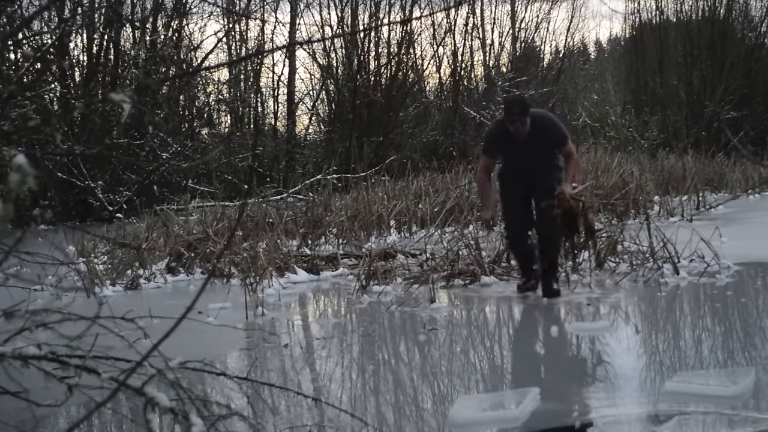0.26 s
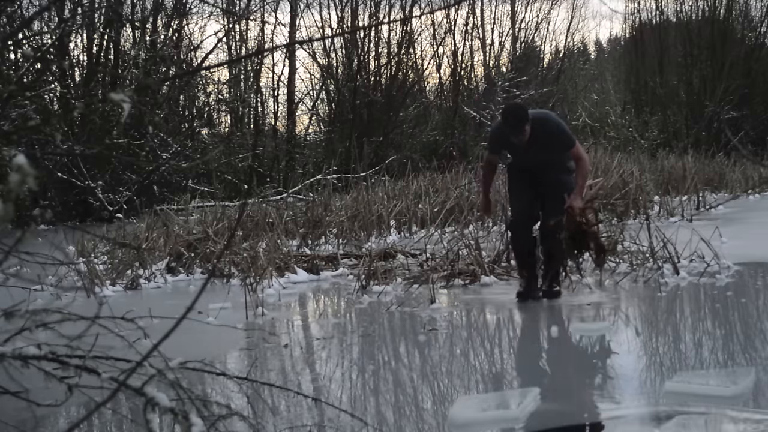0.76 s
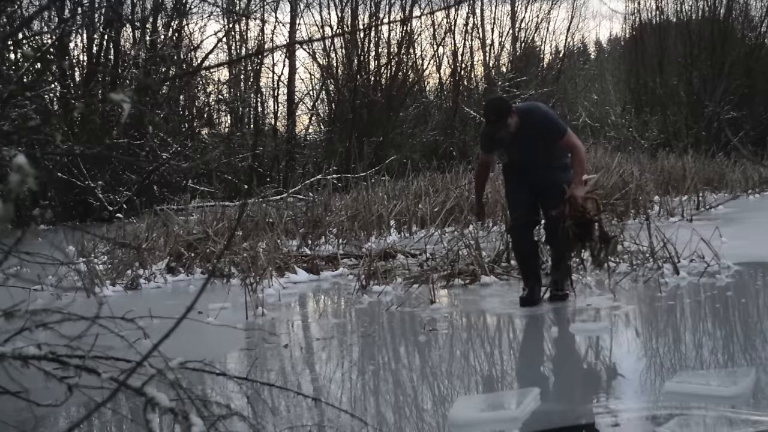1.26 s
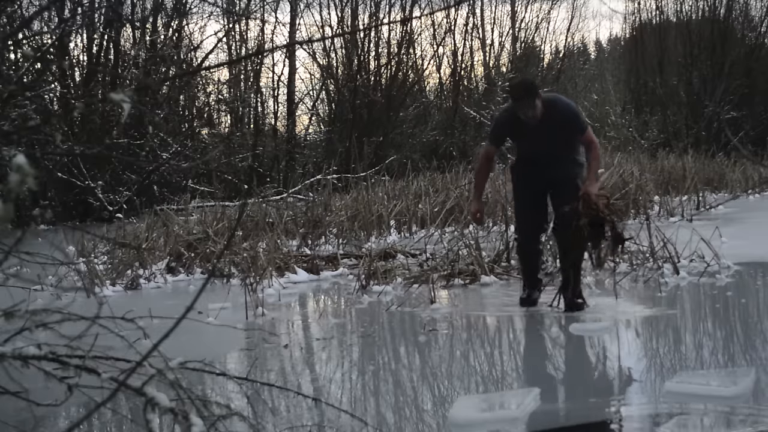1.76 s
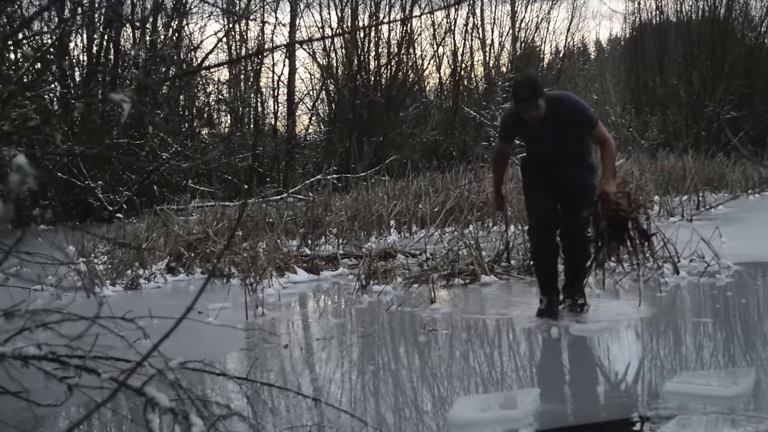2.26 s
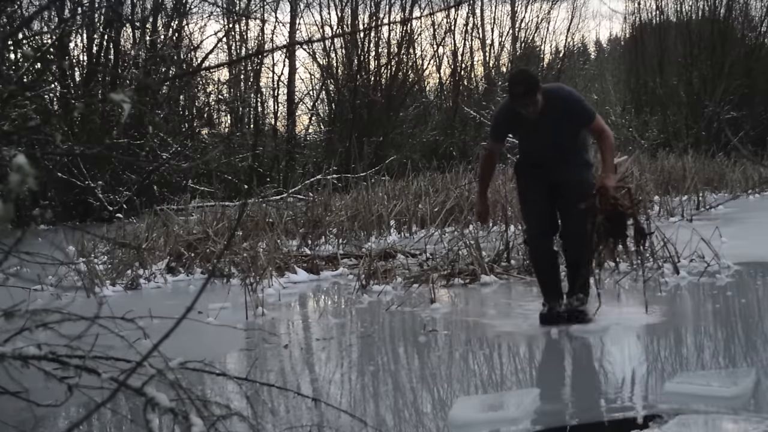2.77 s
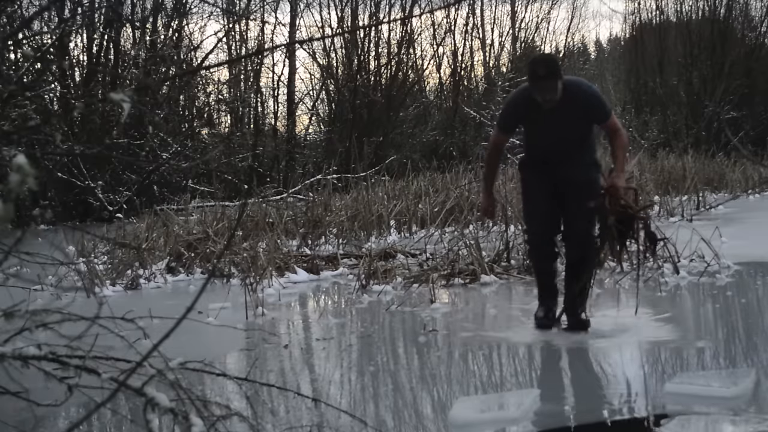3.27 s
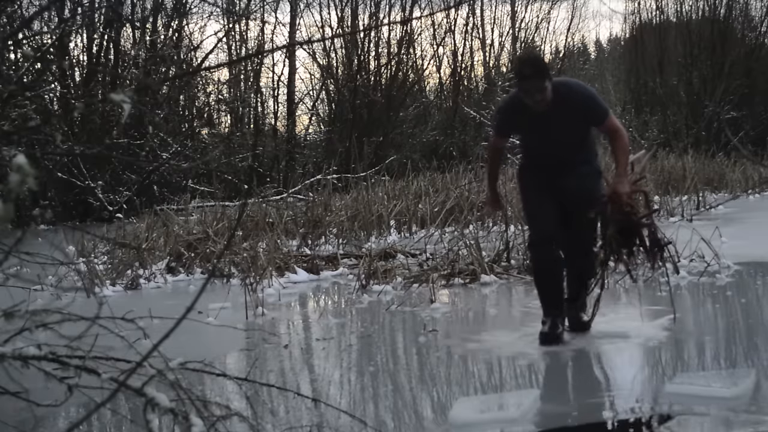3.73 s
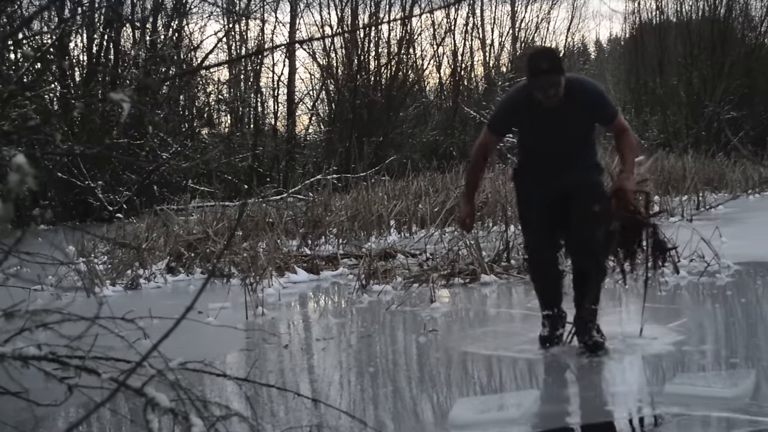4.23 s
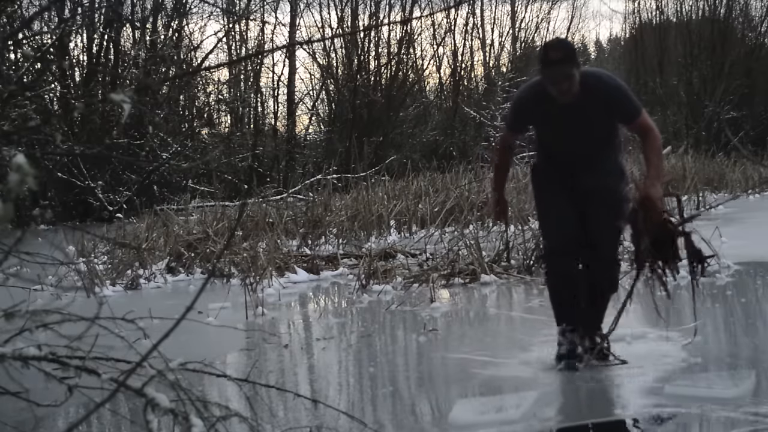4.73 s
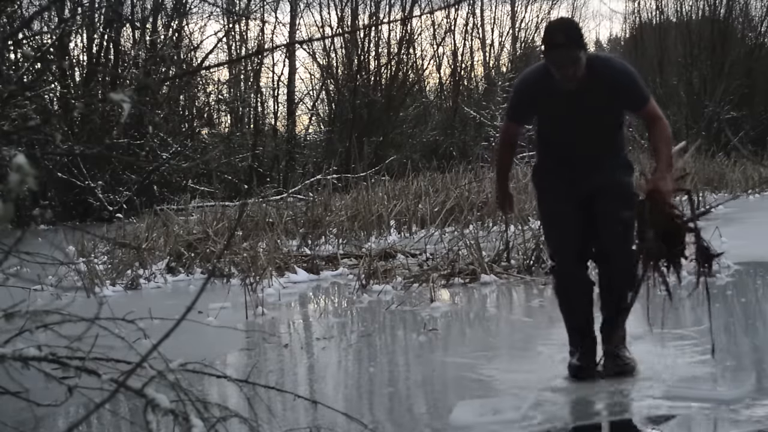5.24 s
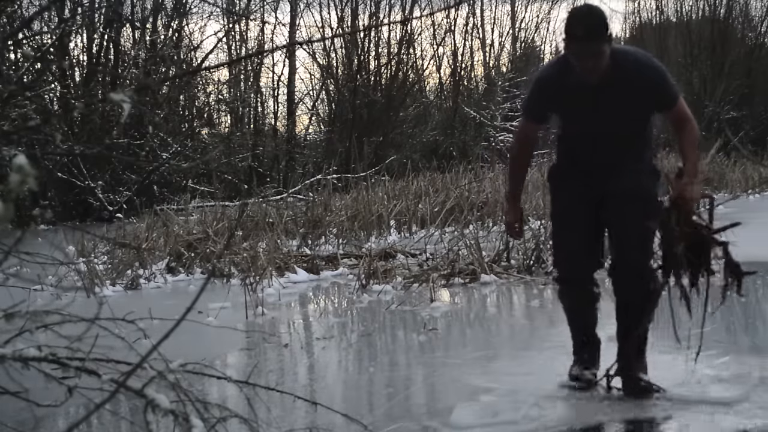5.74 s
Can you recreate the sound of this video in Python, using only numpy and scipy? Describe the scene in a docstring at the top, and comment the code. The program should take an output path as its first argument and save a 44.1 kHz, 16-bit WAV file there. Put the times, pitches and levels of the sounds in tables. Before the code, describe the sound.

Someone wades towards the listener over a frozen pond; water sprays and sloshes, ice pings and snaps, over a faint distant rumble.

```python
"""Boots on a wet frozen pond

A man in boots walks towards the microphone over thin ice with a film of water on it.
The ice cracks under his weight: each crack sends a short tone near 1 kHz ahead of its own snap.
At each stride the lifted boot gulps and ploughs up spray and drops; the water calms when he stands.
A low rumble lies far behind the trees. Clicks, ringing bubbles, short tones and filtered noise make it all."""
import sys
import numpy as np
from scipy import signal
from scipy.fft import rfft, irfft
from scipy.io import wavfile
from scipy.ndimage import uniform_filter1d

SR = 44100
rng = np.random.default_rng(int(sys.argv[2]) if len(sys.argv) > 2 else 0)


def transcribe(u):
    """Save the signal u as a 16-bit wav file named by the first command-line argument.

    u: samples, shape (n,) or (channels, n), limited to [-1, 1]; the rate is SR.
    q: integer samples, one column per channel.
    """
    v = np.clip(np.atleast_2d(u).T, -1, 1)
    q = np.round(v * 32767).astype(np.int16)
    wavfile.write(sys.argv[1], SR, q)


N = 264600
TIME = np.arange(N) / SR


def undb(db):
    """Decibels to gain."""
    return 10 ** (np.asarray(db) / 20)


def unit(x):
    """Scale to an rms of one."""
    return x / np.sqrt(np.mean(x ** 2))


def colour(x, points):
    """Shape the spectrum through (Hz, dB) points, with a filter that never sounds early and has unit power."""
    hz, db = np.transpose(points)
    log_freq = np.log(np.fft.rfftfreq(N, 1 / SR) + 1)
    gain = undb(np.interp(log_freq, np.log(hz), db))
    # Folding the cepstrum forward in time gives the minimum-phase filter.
    cepstrum = irfft(np.log(unit(gain)), N)
    cepstrum[1:N // 2] *= 2
    cepstrum[N // 2 + 1:] = 0
    impulse = irfft(np.exp(rfft(cepstrum)), N)[:4096]
    return signal.fftconvolve(x, impulse)[:N]


def add(out, start_s, sound):
    """Mix a short sound into a track, cutting off what falls outside."""
    i = int(round(start_s * SR))
    lo, hi = max(i, 0), min(i + len(sound), N)
    if hi > lo:
        out[lo:hi] += sound[lo - i:hi - i]


def wander(rate_hz):
    """Smooth random ups and downs around zero, with an rms of one."""
    step = max(int(SR / rate_hz), 1)
    held = rng.standard_normal(N)[np.arange(N) // step]
    return unit(uniform_filter1d(held, step))


def patter(rate_hz, spread_db):
    """Random clicks; a positive spread makes a few much larger, a negative one a few much smaller."""
    hit = rng.random(N) < rate_hz / SR
    size = np.minimum(rng.exponential(size=N), 6)
    sign = rng.choice([-1, 1], N)
    return unit(hit * undb(spread_db * size) * sign)


def bubble(hz, cycles, rise=0.07, onset=0.05):
    """A damped ring that starts within a cycle; its pitch creeps up as the bubble nears the surface."""
    turns = np.arange(int(5 * cycles * SR / hz)) * hz / SR
    envelope = (1 - np.exp(-turns / onset)) * np.exp(-turns / cycles)
    return envelope * np.sin(2 * np.pi * turns * (1 + rise * turns / cycles / 2))


def bubbles(low_hz, high_hz, cycles, spread_db, count):
    """A steady swarm of bubbles of mixed sizes."""
    out = np.zeros(N)
    for when, pitch, damping, size in rng.random((count, 4)):
        hz = low_hz * (high_hz / low_hz) ** pitch
        size_db = -spread_db * np.log(size + 0.033)
        add(out, when * N / SR, undb(size_db) * bubble(hz, cycles * (.5 + damping)))
    return unit(out)


def flexure(hz, swell_ms, bend=0.024, stop_ms=0.31, shape=1.25):
    """Bending waves outrun the air: a tone swells, sinks a little and stops as the snap arrives."""
    lead_s = 4 * swell_ms / 1000  # how far the sound begins before its snap
    t = np.arange(-int(lead_s * SR), int(.004 * SR)) / SR
    early = np.maximum(-t, 0) * 1000 / swell_ms
    late = np.maximum(t, 0) * 1000 / stop_ms
    phase = 2 * np.pi * (hz * t * (1 + bend * (early / 2 - 1)) + rng.random())
    return np.exp(-early ** shape - late) * np.sin(phase), lead_s


def approach(far_db, near_db):
    """Gain that grows steadily from start to end, as the walker comes near."""
    return undb(far_db + (near_db - far_db) * TIME / TIME[-1])


def swell(start_s, hold_s, attack_s, release_s):
    """An envelope: it grows up to the start, holds, then fades."""
    before = np.maximum(start_s - TIME, 0)
    after = np.maximum(TIME - start_s - hold_s, 0)
    return np.exp(-before / attack_s - after / release_s)


# Colour of the far rumble: pitch_hz, relative level_db (per Hz)
RUMBLE_COLOUR = [(20, -14), (45, -3.5), (75, 0.5), (130, -2), (220, -5), (450, -11.5), (1000, -14),
                 (2500, -44), (8000, -33), (16000, -29)]


def distant_rumble():
    """Low filtered noise from far behind the trees, which slowly grows."""
    return colour(rng.standard_normal(N), RUMBLE_COLOUR) * approach(-49.5, -47.5)


# His weight bears on the ice: start_s, length_s, creak level_db (at the start, before the sag)
WEIGHT_SHIFTS = [(0.539, 0.062, -40.5), (0.733, 0.012, -42), (.93, 0.012, -45), (1.17, 0.25, -53),
                 (1.552, 0.05, -49.5), (1.797, 0.067, -43), (2.103, 0.016, -50), (2.292, 0.034, -47),
                 (2.598, 0.12, -44.5), (3.196, .03, -39), (3.305, .21, -47.5), (3.896, 0.072, -37),
                 (3.985, 0.11, -41.5), (4.085, 0.052, -35.5), (4.342, .03, -39), (4.497, 0.048, -46),
                 (4.595, 0.11, -42.5), (4.774, 0.031, -36.5), (4.981, 0.026, -38.5), (5.146, 0.02, -31),
                 (5.351, 0.024, -32), (5.457, .03, -33), (5.515, 0.032, -35.5), (5.633, 0.04, -37.5),
                 (5.692, 0.055, -35.5), (5.799, 0.038, -32.5), (5.943, 0.025, -37)]


def strain(sag_db_per_s=14, attack_s=0.0058, release_s=0.017):
    """How hard the ice is bent: each shift of weight builds up, sags as the ice cracks, and lets go."""
    power = np.zeros(N)
    for start_s, length_s, db in WEIGHT_SHIFTS:
        sag_db = sag_db_per_s * np.maximum(TIME - start_s, 0)
        power += (undb(db - sag_db) * swell(start_s, length_s, attack_s, release_s)) ** 2
    return np.sqrt(power)


def creak(load, far_hz=980, near_hz=1190, far_ms=5.6, near_ms=1.6, scatter=0.22, spread_db=4.0, count=1400):
    """Many tiny cracks get louder with strain; their tones get higher and shorter as the walker nears."""
    out = np.zeros(N)
    for k, (late, detune, size) in enumerate(rng.random((count, 3))):
        near = (k + late) / count
        hz = (far_hz + near * (near_hz - far_hz)) * (1 + scatter * (detune - .5))
        tone, lead_s = flexure(hz, far_ms + near * (near_ms - far_ms))
        add(out, near * N / SR - lead_s, undb(-spread_db * np.log(size + 0.0067)) * tone)
    resting = approach(-75.5, -46.5)  # faint creaking between the loads
    return unit(out) * np.hypot(load, resting)


def wash(start_s, end_s, attack_s=0.035, release_s=0.048, settle_db=-14, settle_s=0.4):
    """Water set moving by a boot: it is pushed for a while, then trickles back slowly."""
    hold_s = max(end_s - start_s, 0)
    push = swell(start_s, hold_s, attack_s, release_s)
    return np.hypot(push, undb(settle_db) * swell(start_s, hold_s, attack_s, settle_s))


# A boot lifts and swings forward: lift_s (middle of the gulp), gulp_length_s, gulp level_db,
# plough_delay_s (after the lift, or before it if negative), plough_length_s, spray level_db, slosh level_db.
# Levels are relative: each sound adds its own gain.
STRIDES = [(.09, .05, -67, 0.023, 0.027, -41.5, -54), (.785, .1, -45.5, -0.036, 0.21, -43.5, -49),
           (1.444, 0.092, -42, 0.049, 0.21, -43.5, -51.5), (2.12, 0.14, -46.5, 0.041, 0.28, -43.5, -50.5),
           (2.865, .12, -41.5, 0.098, 0.18, -43, -53.5), (3.41, 0.093, -45.5, 0.012, 0.21, -42.5, -52),
           (4.137, .085, -44, -0.072, 0.41, -41, -51.5), (4.719, 0.089, -40.5, -0.054, 0.4, -40, -48.5),
           (5.352, 0.068, -43.5, -0.052, 0.23, -37.5, -46), (5.869, 0.17, -42, 0.028, 0.03, -36, -44.5)]


def flow(load, squeezed_spray_db=-11, squeezed_slosh_db=-15, slosh_lag_s=0.037, slosh_sag_db_per_s=24):
    """Strength of spray and slosh: restless film, water squeezed out by the load, and ploughing boots."""
    spray = approach(-53.5, -46.5) ** 2 + (load * undb(squeezed_spray_db)) ** 2
    slosh = approach(-60, -54) ** 2 + (load * undb(squeezed_slosh_db)) ** 2
    for lift_s, _, _, delay_s, plough_s, spray_db, slosh_db in STRIDES:
        end_s = lift_s + delay_s + plough_s
        # The bow wave rises at the lift and dies down during the swing.
        sag_db = slosh_sag_db_per_s * np.maximum(TIME - lift_s, 0)
        spray += (wash(lift_s + delay_s, end_s) * undb(spray_db)) ** 2
        slosh += (wash(lift_s + slosh_lag_s, end_s) * undb(slosh_db - sag_db)) ** 2
    return np.sqrt(spray), np.sqrt(slosh)


# Colours of flying spray and of heavier slosh: pitch_hz, relative level_db (per Hz)
SPRAY_COLOUR = [(1500, -18), (3000, -10), (5000, -8.5), (7000, -4.5), (9000, 1), (10500, -5.5),
                (12500, -15.5), (16000, -31)]
SLOSH_COLOUR = [(300, -29.5), (700, 5.5), (1300, -0.5), (2000, 1.5), (3200, -4), (5000, -23), (9000, -32)]


def wading(load, spray_gain_db=1, slosh_gain_db=2.5):
    """Clicks and bubbles swell and ebb with each stride; single droplets tick on the ice."""
    spray_flow, slosh_flow = flow(load)
    surge_db = 1.75 * wander(rate_hz=99)
    ticks = patter(rate_hz=90, spread_db=0.5)
    fizz = bubbles(low_hz=3850, high_hz=12600, cycles=7.7, spread_db=3.0, count=2400)
    spray = patter(rate_hz=6000, spread_db=-0.4) + undb(-6.5) * fizz + undb(-5.5) * ticks
    spray = unit(colour(spray, SPRAY_COLOUR)) * spray_flow * undb(spray_gain_db)
    froth = bubbles(low_hz=1114, high_hz=4600, cycles=6.9, spread_db=2.5, count=2600)
    slosh = patter(rate_hz=3000, spread_db=4.5) + undb(-6.5) * froth + undb(-12.5) * ticks
    slosh = unit(colour(slosh, SLOSH_COLOUR)) * slosh_flow * undb(slosh_gain_db)
    return (spray + slosh) * undb(surge_db)


# Both boots stand still: start_s, length_s
PAUSES = [(.43, 0.019), (0.63, 0.011), (1.078, 0.016), (1.906, 0.12), (2.518, 0.041), (3.745, 0.072),
          (5.208, 0.054)]


def calm(drop_db=-4, fade_s=0.0097):
    """Gain of the water and the creaking, which die down while the walker stands still."""
    still = np.max([swell(start_s, length_s, fade_s, fade_s) for start_s, length_s in PAUSES], axis=0)
    return undb(drop_db * still)


def gulps(start_hz=920, end_hz=482, scatter=0.24, cycles=2.37, glide=0.046, gain_db=1.5, spread_db=7,
          high_ratio=1.75, high_db=-4, count=30):
    """The hollow under a lifting boot grows and swallows ever larger, lower bubbles; smaller ones break off."""
    out = np.zeros(N)
    for lift_s, length_s, db, *_ in STRIDES:
        for k, (late, detune, size, split) in enumerate(rng.random((count, 4))):
            u = 1.6 * ((k + late) / count - .5)  # place in the gulp, in gulp lengths from its middle
            hz = start_hz * (end_hz / start_hz) ** (u + .5) * np.exp(scatter * 2 * (detune - .5))
            gain = undb(db + gain_db + spread_db * (2 * size - 0.5)) * np.exp(-4 * u ** 2)
            high_hz = hz * high_ratio * 2 ** (split - .5)
            add(out, lift_s + u * length_s, gain * bubble(hz, cycles, glide))
            add(out, lift_s + u * length_s, gain * undb(high_db) * bubble(high_hz, cycles, glide))
    return out


# Wet slaps of a sole: peak_s, level_db, rise_ms, fall_ms
SLAPS = [(.077, -29, 8.8, 5.8), (.1, -35.5, 5, 12), (0.087, -21, 0.87, 3.1), (0.2491, -14, 3.3, 5.9),
         (0.687, -34, 0.66, 4), (.784, -34.5, 7.3, 4.6), (.937, -43, 1, 3), (1.041, -33.5, .4, 4.6),
         (1.323, -30, 0.34, 2.3), (1.482, -28.5, 0.46, 0.58), (1.646, -28.5, 0.86, 3.3),
         (2.139, -34, .5, 8.6), (2.242, -32, .5, 1.5), (2.27, -32.5, .5, 3), (3.022, -32, .5, 3.7),
         (3.073, -36, 0.57, 2.5), (3.457, -31.5, 1.1, 5.1), (3.630, -23, .75, 1.7), (3.791, -29.5, 1, 3.1),
         (4.468, -35, 1, 5.5), (4.497, -28.5, 2.9, 6.3), (4.652, -31, .5, 8.4), (5.013, -29, .5, 2.3),
         (5.0645, -27, .4, 2.5), (5.086, -31, .5, 2.4), (5.2868, -19.5, 0.31, 1.5), (5.371, -30, 48, 5.7),
         (5.522, -31.5, .5, 2.1), (5.901, -35, .5, 7.2)]
# Colour of a slap: pitch_hz, relative level_db (per Hz)
SLAP_COLOUR = [(300, -26), (1200, -15.5), (2500, -8), (4500, -6), (7000, -1), (8800, 7.5), (10500, 0),
               (12500, -14), (16000, -25)]


def slaps(tail_db=-21, tail_s=0.036):
    """A sole squeezes the water film out in a burst of tiny clicks; the spray falls back after it."""
    force = np.zeros(N)
    t = TIME[:SR // 4] - 1 / 20  # zero at the peak
    for peak_s, db, rise_ms, fall_ms in SLAPS:
        burst = np.exp(-1000 * np.abs(t) / np.where(t < 0, rise_ms, fall_ms))
        tail = undb(tail_db) * (t > 0) * np.exp(-np.abs(t) / tail_s)
        add(force, peak_s + t[0], undb(db) * (burst + tail))
    return colour(force * patter(rate_hz=19000, spread_db=0.4), SLAP_COLOUR)


# Cracks in the ice: snap_s (when the snap arrives), tone level_db, pitch_hz (one swell time before the snap),
# swell_ms, snap level_db (relative)
CRACKS = [ (.2240, -17, 966, 2.6, -31.5), (0.3092, -24, 980, 3, -44), (.3936, -17.5, 1020, 3.4, -39.5),
          (0.4049, -24.5, 980, 5.1, -47), (0.4722, -18, 995, 5.5, -34), (0.5292, -21.5, 880, 2.5, -29),
          (.5370, -24, 970, 4, -55), (1.1486, -21.5, 1060, 2.2, -34.5), (1.2043, -19.5, 1004, 3.9, -37),
          (1.228, -32, 980, 4.9, -39.5), (1.621, -29.5, 1110, 2, -46), (1.7943, -24, 1010, 3.9, -41),
          (1.809, -33, 960, 4, -44), (2.0023, -17.5, 1045, 2.4, -29), (2.016, -31, 930, 4.4, -57),
          (2.302, -37, 1110, 2.7, -40), (2.561, -30, 1050, 8.3, -55), (2.6489, -27, 1010, 4.1, -31),
          (3.0294, -27, 1010, 1.6, -37), (3.1926, -20.5, 1120, 2.8, -37), (3.2013, -18, 1130, 1.7, -38),
          (3.284, -26.5, 1020, 2, -41), (3.81, -20, 1080, 4.3, -28.5), (3.907, -40, 1090, 2.8, -30),
          (3.93, -26, 1060, 5.6, -35.5), (3.953, -26, 1094, 6, -54), (4.077, -19, 1080, 2.8, -38),
          (4.3458, -23, 1240, 2.2, -31), (4.4843, -20.5, 1080, 1.1, -47), (4.7752, -18.5, 1074, 1.9, -39),
          (4.8243, -25, 1140, 4.6, -34), (5.045, -18.5, 1243, 4.3, -40), (5.1331, -7.5, 1220, 1.2, -22.5),
          (5.148, -21, 950, 4.2, -40), (5.3750, -16, 1200, 0.85, -18), (5.4451, -6.5, 1195, 1.2, -29),
          (5.4695, -19.5, 1110, 2.7, -31), (5.7109, -13.5, 1370, 0.33, -26.5),
          (5.721, -13, 1120, 0.52, -43), (5.7410, -12, 1100, 0.6, -29), (5.7731, -17.5, 1470, 0.76, -32),
          (5.818, -27, 1240, 0.9, -30), (5.9282, -15, 1270, .45, -43), (5.9464, -15.5, 1146, 3.6, -27.5)]
# Colours of the snap and of crack edges rubbing together: pitch_hz, relative level_db (per Hz)
SNAP_COLOUR = [(200, -9), (1200, 7), (2500, -2), (4500, -4.5), (8500, 3.5), (11000, -5), (16000, -58)]
CRUNCH_COLOUR = [(200, -9), (550, -36), (850, 2), (1200, 3.5), (1700, -4), (2600, -10.5), (5000, -16),
                 (12000, -57)]


def cracks(after_db=-16.5, after_s=.04, decay_s=0.006, tail_db=-14, tail_s=0.011, snap_gain_db=-2,
           crunch_db=-22, crunch_s=0.013, count=7):
    """Each crack is a tone and a snap; its edges crunch together and it runs on in a few weaker jumps."""
    tones, snaps, rubbing = np.zeros((3, N))
    t = TIME[:SR // 5]
    snap_shape = np.exp(-t / decay_s) + undb(tail_db) * np.exp(-t / tail_s)
    for snap_s, db, hz, swell_ms, snap_db in CRACKS:
        tone, lead_s = flexure(hz, swell_ms)
        add(tones, snap_s - lead_s, undb(db) * tone)
        add(snaps, snap_s, undb(snap_db + snap_gain_db) * snap_shape)
        add(rubbing, snap_s, undb(db + crunch_db) * np.exp(-t / crunch_s))
        for k, (late, detune) in enumerate(rng.random((count, 2))):
            share = (k + late) / count
            tone, lead_s = flexure(hz * (1 + 0.23 * (detune - .5)), swell_ms)
            jump_s = snap_s + 0.00312 + share * after_s
            add(tones, jump_s - lead_s, undb(db + after_db - 19 * share) * tone)
    snap = colour(snaps * patter(rate_hz=23000, spread_db=2.5), SNAP_COLOUR)
    crunch = colour(rubbing * patter(rate_hz=3000, spread_db=-0.5), CRUNCH_COLOUR)
    return tones + snap + crunch


# Drops and small bubbles: start_s, level_db (relative), pitch_hz (at the start), decay_cycles
DROPS = [(0.672, -21, 9400, 4.3), (0.775, -26, 5900, 6.5), (0.782, -18.5, 5770, 9.3),
         (.895, -35, 1350, 4.1), (1.003, -26, 7600, 11), (1.353, -27.5, 2160, 1.5),
         (4.174, -24.5, 1810, 6.9), (4.371, -24.5, 2510, 6.7), (4.436, -25, 2700, 8),
         (4.612, -23, 4700, 7.6), (4.681, -25, 1960, 6.9), (4.833, -29, 3260, 8.8), (5.863, -17, 7000, 6.5)]


def drops(gain_db=-1, split_db=-8, split_s=0.019, count=3):
    """Single drops ring out above the spray and shed a few satellite bubbles."""
    out = np.zeros(N)
    for start_s, db, hz, cycles in DROPS:
        add(out, start_s, undb(db + gain_db) * bubble(hz, cycles))
        for late, detune in rng.random((count, 2)):
            satellite = bubble(hz * (0.8 + 0.44 * detune), cycles / 2)
            add(out, start_s + late * split_s, undb(db + split_db) * satellite)
    return out


def trees(x, wet_db=-19, t60_s=0.5, onset_s=0.0022):
    """Trunks and reeds round the pond scatter a faint, dull echo, made with fading noise."""
    t = TIME[:SR]
    echo = rng.standard_normal(SR) * undb(-60 * t / t60_s) * (1 - np.exp(-t / onset_s))
    echo = signal.sosfilt(signal.butter(1, 5000, fs=SR, output="sos"), echo)
    return undb(wet_db) * signal.fftconvolve(x, echo / np.linalg.norm(echo))[:N]


def scene():
    """The walker on the ice, the echo from the trees and a distant rumble."""
    load = strain()
    walker = (creak(load) + wading(load)) * calm() + gulps() + slaps() + cracks() + drops()
    return (distant_rumble() + walker + trees(walker))[None]


def record(dry):
    """A steep low-pass filter cuts the treble above 15950 Hz."""
    return signal.sosfilt(signal.ellip(14, .2, 80, 15950, fs=SR, output="sos"), dry)


dry = scene()
out = record(dry)
transcribe(out)
```